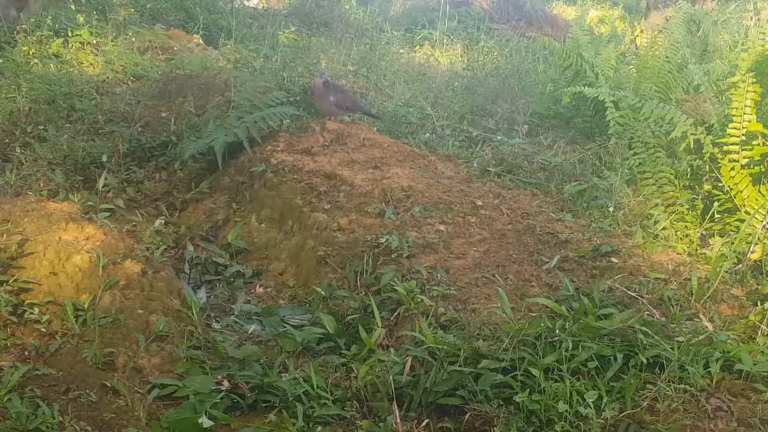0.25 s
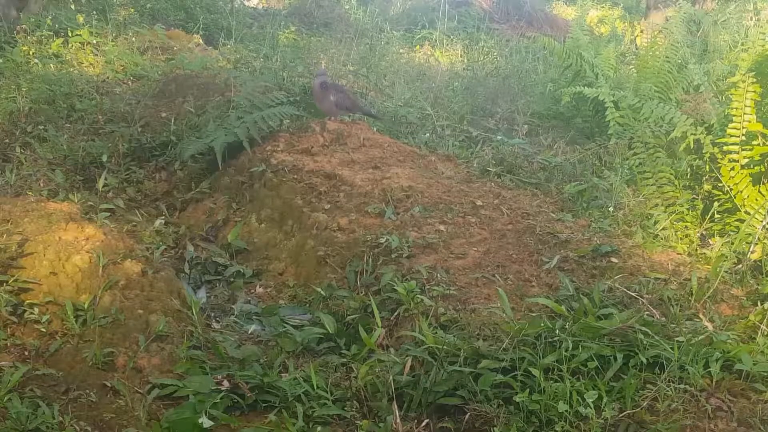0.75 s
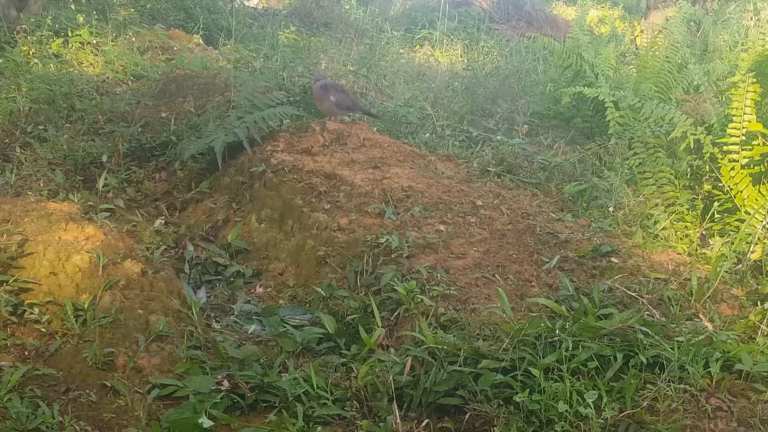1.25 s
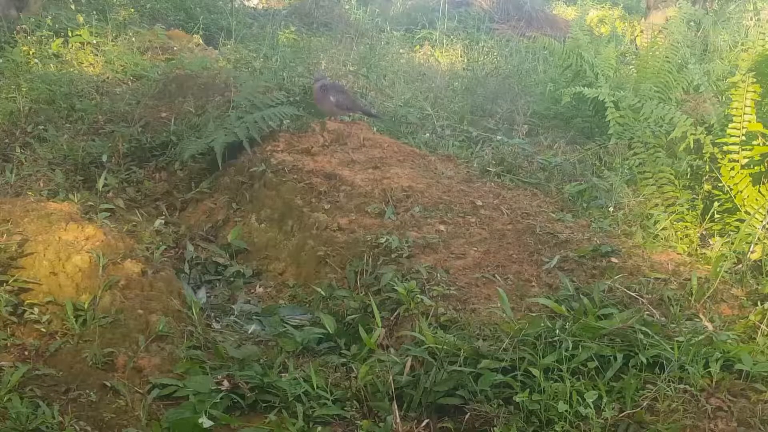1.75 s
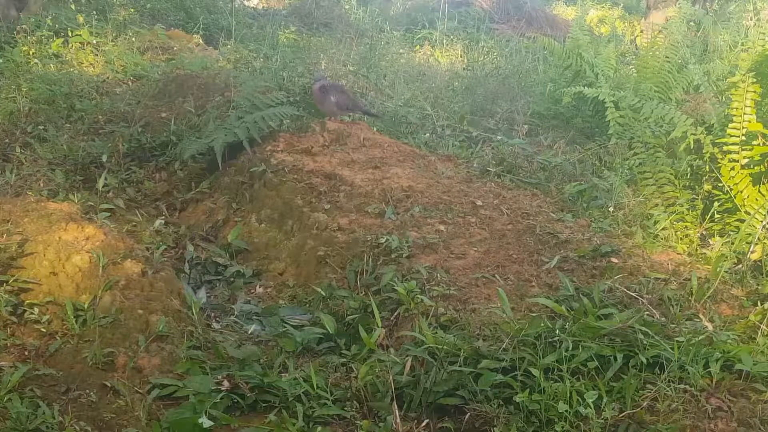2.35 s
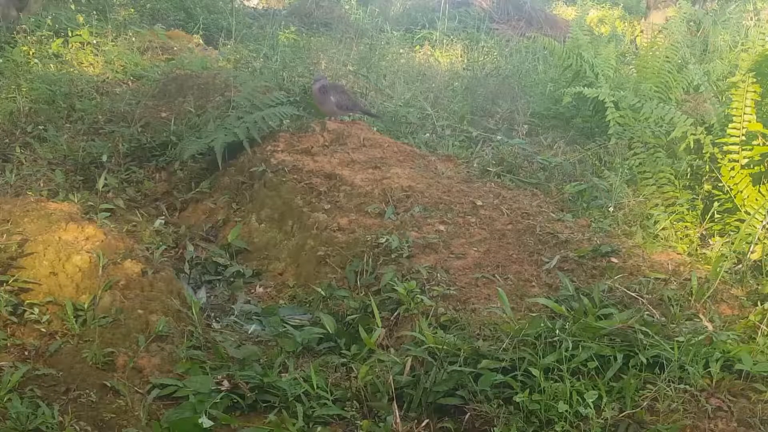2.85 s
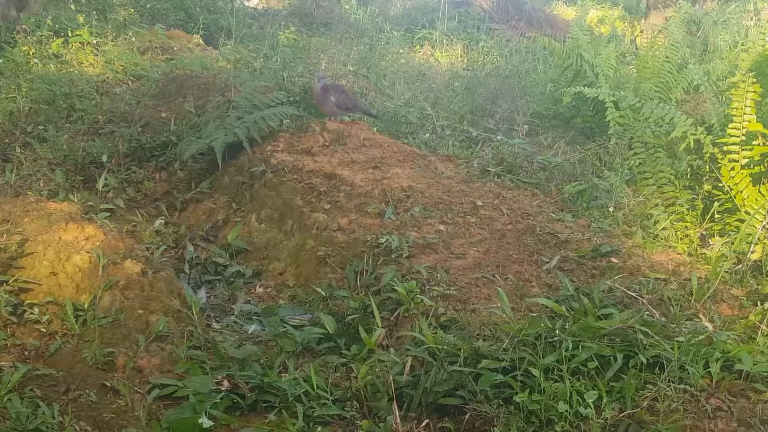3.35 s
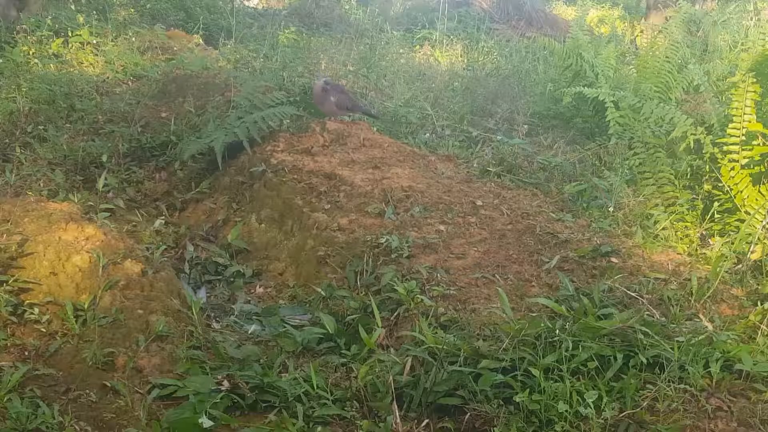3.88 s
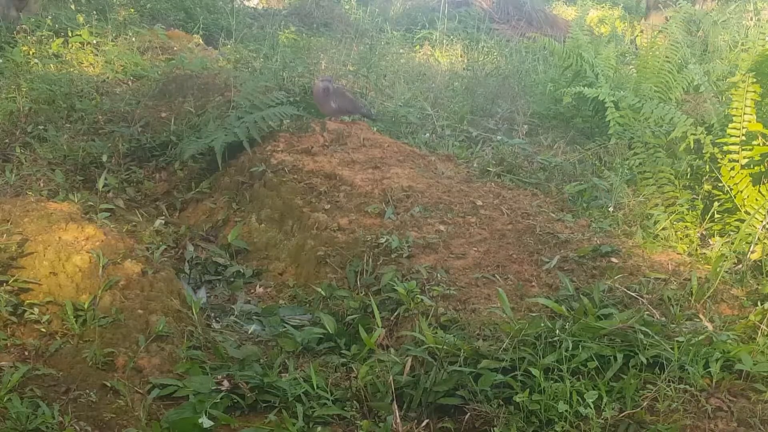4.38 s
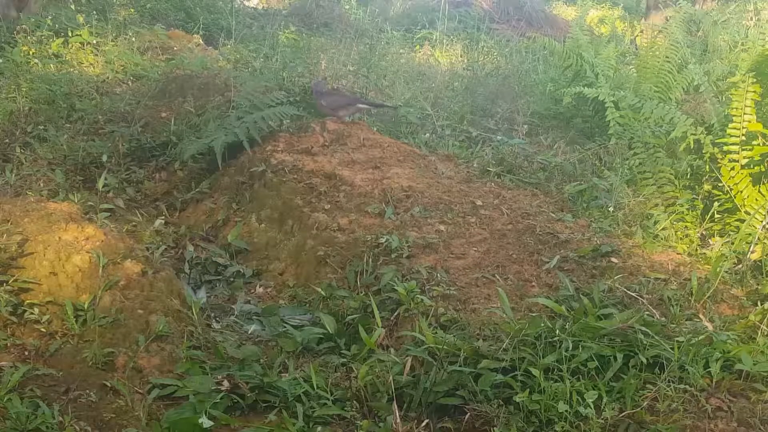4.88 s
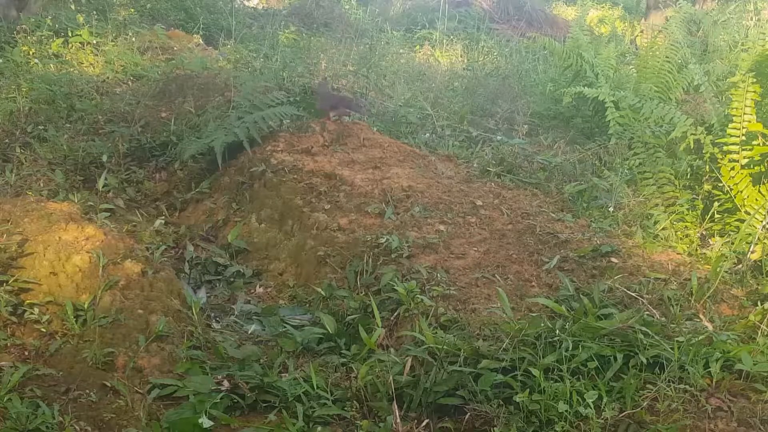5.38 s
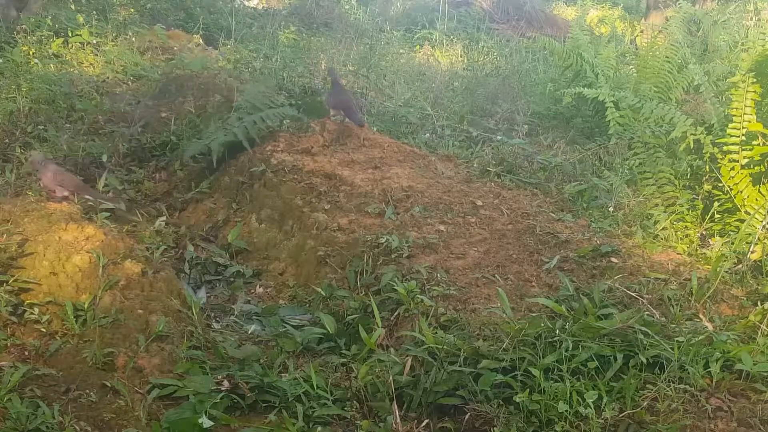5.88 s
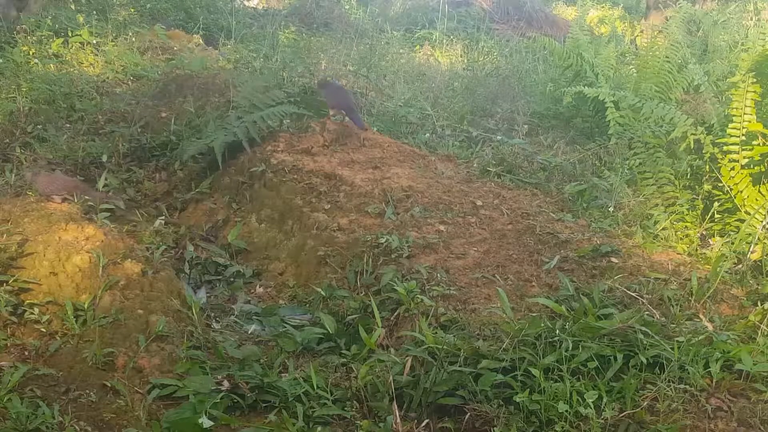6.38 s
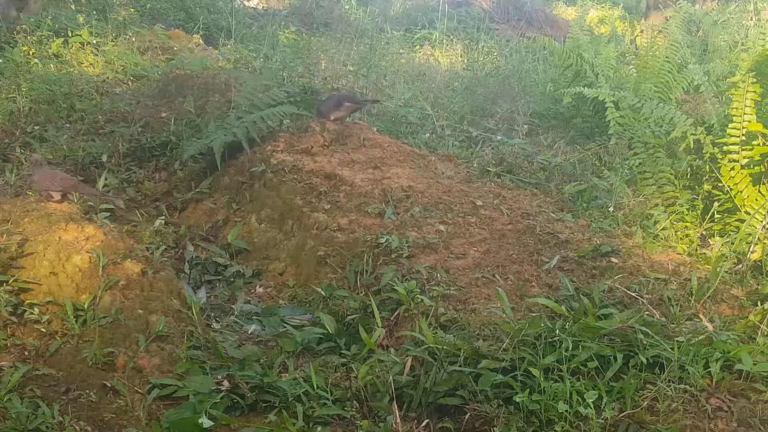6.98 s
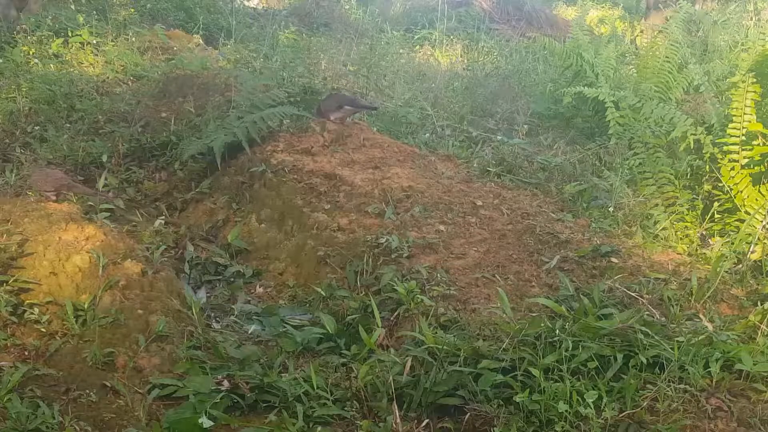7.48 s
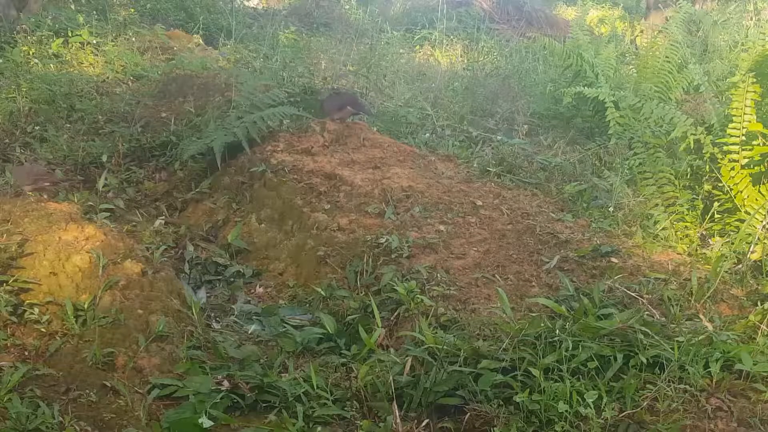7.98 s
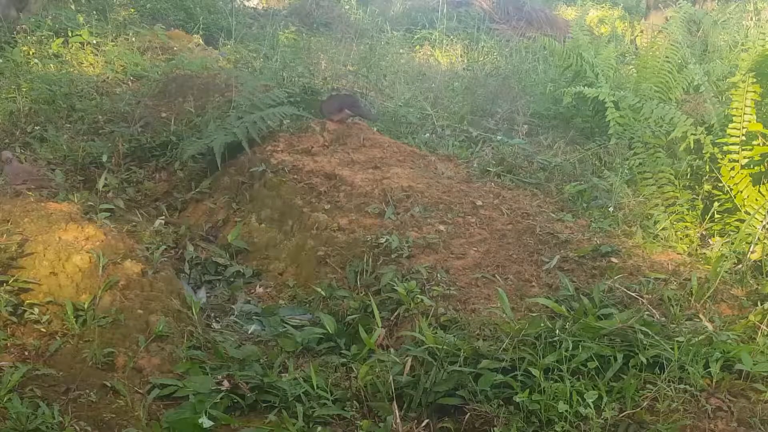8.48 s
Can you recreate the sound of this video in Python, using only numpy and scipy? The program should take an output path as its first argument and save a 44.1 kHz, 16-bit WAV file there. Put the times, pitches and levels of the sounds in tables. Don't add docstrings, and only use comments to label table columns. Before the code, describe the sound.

Over steady cricket chirps, rasping far insects and fine air hiss, doves call with mellow, nearly pure tones chopped by throat flutter. Distant and near songs alternate first, with faint bird whistles and a tiny twitter. Gentle clucks and steps lead to a short thumping flurry of wings and a landing on earth. Afterwards, close rolling growls fill the end. Open-air stereo, slight woodland reverberation, light wind buffets.

```python
import sys
import numpy as np
from scipy import signal
from scipy.io import wavfile

SR = 44100
rng = np.random.default_rng(int(sys.argv[2]) if len(sys.argv) > 2 else 0)


def dump(signal):
    limited = np.clip(np.atleast_2d(signal).T, -1, 1)
    pcm = np.round(limited * 32767).astype(np.int16)
    wavfile.write(sys.argv[1], SR, pcm)


def decibels_to_gain(level_db):
    exponent = np.asarray(level_db, float) / 20
    return 10 ** exponent


N = 384993
T = np.arange(N) / SR

# (frequency [Hz], level [dB per Hz])
AIR_COLOUR = [(22, -22), (45, -4.5), (80, -3), (150, -12), (250, -12), (500, -14), (900, -18.5),
              (2000, -20.5), (3300, -21), (4300, -31.5)]
# (frequency [Hz], level [dB per Hz])
HISS_COLOUR = [(3500, -39), (4500, -9), (6200, 9.5), (8000, 5), (9500, 4), (12000, -10), (14300, 6.5),
               (15000, -25)]
AIR_DB, HISS_DB = -63, -63
# (frequency [Hz], likeness [0 to 1])
LIKENESS = [(30, 1), (60, 0.98), (150, 0.83), (400, 0.52), (1000, 0), (2500, 0.0019), (15000, 0)]
# (frequency [Hz], left-right step [dB])
SIDE_LEAN = [(40, -1), (180, -2.5), (550, -0.5), (1650, -2), (5000, -3.5), (15000, 5.5)]
# (time [s], level [dB])
BREEZE = [(0, -66), (.6, -67), (1.2, -71.5), (1.8, -67), (2.4, -72.5), (3, -74), (4, -76), (5, -72),
          (5.6, -75), (6.2, -72.5), (7.5, -74), (8.73, -76)]
# (middle [s], length [s], level [dB])
BUFFETS = [(0.049, 0.041, -58), (0.156, 0.046, -54), (0.416, 0.063, -62), (0.681, 0.11, -65),
           (1.668, 0.061, -64), (1.95, 0.074, -67), (2.144, 0.1, -62), (2.408, 0.041, -62),
           (2.53, 0.065, -59.5), (2.788, 0.044, -63), (3.402, 0.12, -64), (4.854, .1, -65),
           (6.75, 0.086, -72), (7.8, 0.082, -68)]
DRONE_HZ, DRONE_WIDTH_HZ, DRONE_DB = 146, 13.8, -74.5
CHORUS_DB = -58

# (pulse rate [per s], lateness [turns], left-right step [dB])
TREE_CRICKETS = [
    (14.94, 0, 8),
    (14.18, .54, -3),
]
TREE_CRICKET_DB = -65

# (time [s], chirp rate [per s])
CHIRP_PACE = [(0, 17.592), (1, 17.987), (1.7, 17.788), (2.3, 17.088), (3.1, 17.129), (3.6, 18.021),
              (4.2, 18.418), (4.7, 19.343), (5.3, 19.185), (6.2, 18.873), (8.73, 18.158)]
CHIRPS_AT_START = -.409
# (from its middle [ms], length [ms], pitch [Hz], level [dB], octave [dB], bite [dB])
STROKES = [
    (-20.5, 5, 6780, -5, -6, -30),
    (-6.5, 5.5, 6940, -2, 0, 0),
    (6, 6, 6920, 0, 0, 0),
    (12.5, 6, 6830, -13, -12, -30),
]
WING_DB, WING_OCTAVE_DB = -57.5, -64.5
# (time [s], level [dB], pitch [Hz])
BITE = [
    (4.3, -63.5, 7210),
    (5.8, -55, 7325),
    (8.73, -53, 7370),
]
BITE_RISE_S, BITE_FALL_HZ_PER_S = .001, 70000

# (time [s], pitch [Hz], level [dB])
WHISTLES = [
    [(.1, 1980, -79), (.17, 2200, -74), (.25, 2320, -74), (.33, 2340, -75)],
    [(1.25, 2900, -80), (1.33, 3000, -79), (1.5, 2850, -76), (1.65, 2750, -79)],
    [(1.7, 2330, -78), (1.79, 2330, -72), (1.87, 2300, -78)],
    [(2.74, 2820, -80), (2.83, 2850, -76), (2.92, 2830, -80)],
]
# (middle [s], length [s], level [dB])
STIRS = [(0.921, 0.08, -68), (1.705, 0.93, -70), (3.93, 0.73, -75), (6.3, 0.16, -71), (6.464, 0.072, -71),
         (7.44, 0.68, -70.5), (5.35, 0.043, -64), (5.4, .03, -65), (5.504, .05, -61), (5.652, .12, -63),
         (5.05, 0.25, -75)]

# (time [s], peak [dB], body pitch [Hz], left-right step [dB])
CLUCKS = [(3.766, -53, 550, -5), (3.85, -55, 580, -3.0), (3.886, -60, 370, -2.5), (3.967, -52.5, 560, -4),
          (4.101, -56, 498, 5), (4.238, -58, 376, -1.5), (4.377, -55.5, 573, -2.5), (4.529, -59, 390, -6),
          (4.795, -64, 616, -2.5), (4.869, -59.5, 608, -7), (5.21, -50.5, 306, 0.5),
          (4.104, -59, 746, -2.5), (4.232, -58, 800, -2.5), (4.55, -59, 745, -5), (4.58, -61, 750, -2.5),
          (4.45, -65, 734, -2.5)]
# (time [s], peak [dB], body pitch [Hz], feather snap [dB])
BEATS = [(5.31, -49.5, 322, -16), (5.331, -53, 158, -14), (5.353, -45.5, 288, -15), (5.365, -49, 269, -20),
         (5.399, -53, 246, -32), (5.4532, -37, 344, -26), (5.484, -52, 301, -2), (5.499, -49, 447, -18),
         (5.506, -43.5, 1064, -30), (5.534, -33.5, 428, -28), (5.558, -45, 157, 5.5),
         (5.592, -51, 407, -17), (5.623, -44.5, 284, -21), (5.668, -47, 295, -22), (5.704, -50, 556, -23),
         (5.727, -41, 151, -9), (5.695, -47, 75, -35), (5.565, -51, 85, -35), (5.385, -55, 90, -35),
         (5.63, -51, 336, -25), (5.782, -52, 162, -20), (5.325, -54, 970, -30), (5.343, -58, 1280, -30),
         (5.462, -50, 760, -28), (5.544, -45, 530, -30), (5.595, -49, 1050, -30), (5.611, -57, 250, -30),
         (5.65, -53, 345, -18), (5.676, -53, 1050, -30), (5.686, -61, 250, -30), (5.749, -50.5, 250, -30),
         (5.798, -53, 202, -30), (5.415, -57, 436, -30), (5.441, -52, 200, -30), (5.525, -43.5, 148, -30),
         (5.572, -61, 500, -22)]
# (frequency [Hz], level [dB per Hz])
RUSH_COLOUR = [(60, 7), (250, -0.5), (550, -8), (1200, -10), (4200, -24.5), (12000, -25)]
RUSH_S, RUSH_DB, RUSH_HALF_S = 5.57, -52.5, 0.16
FEATHER_DB = 1.8

# (multiple of flutter, share of the parent line's dB, level [dB])
SIDE_LINES = [(-1.0, .3, -20), (-.5, .6, -15.5), (1.5, .9, -20), (2.0, .7, -20.5), (2.5, .9, -22)]
FLAP_START_TURNS = 0.84
FLAP_LEAN_RAD = -2.55
FLAP_WANDER_DB, HALF_WANDER_DB = 2.4, 4.5

# (time from its long note [s], pitch [Hz], level [dB], throat flutter [Hz], purr [dB])
FAR_SONG = [
    [(-.47, 403, -98, 125, -10), (-.39, 573, -68.5, 128, -24), (-.33, 450, -76, 122, 2)],
    [(-.26, 470, -71, 130, -12), (-.215, 560, -72, 130, -4), (-.18, 618, -53.5, 122, -20),
     (-.15, 666, -54.5, 132, -18), (-.12, 640, -59, 125, -18)],
    [(.008, 598, -55.5, 137.3, -16), (.045, 642, -63, 165, 3.5), (.1, 622, -72, 155, 7.5),
     (.155, 659, -58, 142, -3.5), (.235, 584, -56, 143.4, -10.5), (.33, 533, -78.5, 130, 3),
     (.43, 440.5, -75, 138.5, -4)],
]
# (start of the long note [s], gain [dB])
FAR_STARTS = [
    (.345, 2),
    (3.272, 2.5),
]
FAR_SPLIT_HZ = 660

# (time [s], pitch [Hz], level [dB], throat flutter [Hz], purr [dB])
NEAR_SONG = [
    [(1.19, 420, -64, 127, -13), (1.215, 602, -43.5, 126, -20), (1.24, 620, -39.5, 121, -38),
     (1.28, 519, -54, 119, -7), (1.32, 464, -50, 137, -8), (1.355, 486, -53, 128, -6)],
    [(1.365, 488, -55, 129, -3), (1.41, 584, -49, 130.5, -5), (1.46, 609, -43.5, 137, -7.5),
     (1.5, 640, -34.5, 130, -21), (1.53, 640, -34.5, 135, -46), (1.565, 596, -43, 130, -14),
     (1.598, 430, -62, 121, -2)],
    [(1.782, 556, -47, 86.7, -10), (1.82, 655, -40.5, 88.2, 1), (1.96, 631, -37.5, 97.8, -5),
     (2.04, 622, -35.5, 125.5, -7.5), (2.1, 633, -34.5, 124, -37), (2.116, 582, -40.5, 69.6, -14.5),
     (2.24, 520, -57, 96.7, -9), (2.272, 478, -49.5, 90, -24), (2.287, 365, -67, 88.8, -22)],
]
# (time [s], pitch [Hz], level [dB], purr [dB])
RUN_NOTES = [
    (96.6, [(6.43, 549, -63, -5), (6.46, 645, -57, 5.5), (6.5, 667, -51, -0.5), (6.54, 586, -65.5, 9), (6.59, 550, -64, -8)]),
    (130, [(7.452, 466, -59, -20), (7.48, 589, -42.5, -11), (7.51, 606, -44.5, -8), (7.58, 568.4, -41, -23), (7.64, 545, -57.5, -7), (7.68, 547, -47.5, -25.5), (7.725, 448, -67, -4)]),
    (95.4, [(8.612, 514, -56, 0), (8.64, 605, -46, -2.5), (8.653, 610, -43.5, 0), (8.663, 699, -35, -21), (8.7, 707, -32.5, -26), (8.77, 688, -29, -32)]),
]
# (start [s], length [s], pitch [Hz], last level [dB], first flutter [Hz],
# strong-weak flapping [dB], purr [dB])
GROWLS = [
    (6.623, 0.278, 576, -44, 96, -6, -0.4),
    (7.026, 0.372, 597.8, -41.3, 117.6, 5, -1),
    (7.946, 0.192, 594, -45, 110, -10, 4),
    (8.256, 0.285, 601, -41.5, 123.3, -6, 1),
]
GROWL_ATTACK_S, GROWL_RELEASE_S = 0.04, 0.038
GROWL_SCOOP, GROWL_DROP, GROWL_LIFT_HZ_PER_S = .88, 0.94, 42
GROWL_OVERSHOOT, GROWL_SETTLE_S = 0.00183, 0.056
GROWL_ONSET_DB, GROWL_SWELL_DB_PER_S, GROWL_END_DB = -12, 29, -14
GROWL_SAG, GROWL_SAG_DB = .95, -7.5
GROWL_SLACK_DB = 24
GROWL_PURR_DB, PURR_FADE_DB_PER_S = -0.5, 29
FLUTTER_RISE_HZ_PER_S, FLUTTER_TOP_HZ = 92, 129.8
EVEN_AFTER_S, EVENING_DB_PER_S = .16, 60

# (time [s], left-right step [dB])
NEAR_SIDE = [(1.7, 5.5), (2.3, 4.5), (6.4, 2.5), (8.73, 3.5)]
PORT_SPLIT_HZ, OCTAVE_SIDE_DB = 980, -6.5


def rms_one(x):
    return x / np.sqrt(np.mean(x ** 2) + 1e-20)


def in_time(rows, t=T):
    s, *columns = np.transpose(rows)
    return [np.interp(t, s, column) for column in columns]


def at_hz(points, hz):
    point_hz, value = np.transpose(points)
    return np.interp(np.log(hz), np.log(point_hz), value)


def drift(rate):
    r = np.exp(-80 * np.pi * rate / SR)
    slow = signal.lfilter([1], [1, -2 * r, r * r], rng.standard_normal(N // 40 + 2002))[2000:]
    return np.interp(np.arange(N) / 40, np.arange(len(slow)), rms_one(slow))


def glide(hz):
    return 2 * np.pi * np.cumsum(hz) / SR


def butter(x, order, hz, kind="low"):
    return signal.sosfilt(signal.butter(order, hz, kind, fs=SR, output="sos"), x)


def resonate(x, hz, width_hz):
    r = np.exp(-np.pi * width_hz / SR)
    poles = [1, -2 * r * np.cos(2 * np.pi * hz / SR), r * r]
    return signal.lfilter(np.array([1, 0, -1]) * (1 - r * r) / 2, poles, x + 1e-18)


def place(x, pan_db, count):
    return np.array([np.roll(x, count) * decibels_to_gain(pan_db / 2), x * decibels_to_gain(-pan_db / 2)])


def foliage(x, t60, wet_db):
    t = T[:SR // 2]
    tail = rng.standard_normal((2, len(t))) * decibels_to_gain(-60 * t / t60) * (t > .012)
    tail = tail / np.sqrt(np.sum(tail ** 2, axis=1, keepdims=True))
    return decibels_to_gain(wet_db) * signal.fftconvolve(x[None], tail, axes=1)[:, :N]


def banded_noise(spectrum, patchy_db):
    out, together, white = 0, drift(0.16), rng.standard_normal((2, 2, N))
    lowest, highest = spectrum[0][0], spectrum[-1][0]
    edges = np.geomspace(lowest, highest, round(2.2 * np.log2(highest / lowest)) + 2)
    for k, (low, high) in enumerate(zip(edges, edges[1:])):
        mid, side = butter(white[k % 2], 2, [low, high], "band")
        hz = np.sqrt(low * high)
        alike = np.clip(at_hz(LIKENESS, hz), 0, 1)
        level_db = at_hz(spectrum, hz) + patchy_db * (.3 * together + drift(8))
        gain = decibels_to_gain(level_db + at_hz(SIDE_LEAN, hz) * np.array([[.5], [-.5]]))
        out = out + gain * (np.sqrt(1 + alike) * mid + np.sqrt(1 - alike) * side * [[1], [-1]])
    return rms_one(out)


def span(rows, fade):
    first, last = rows[0][0], rows[-1][0]
    at = slice(round((first - fade) * SR), min(round((last + fade) * SR), N))
    t = T[at]
    return at, np.clip(np.minimum(t - first, last - t) / fade + 1, 0, 1) ** 2


def hush():
    bed = decibels_to_gain(AIR_DB) * banded_noise(AIR_COLOUR, patchy_db=2.0)
    return bed + decibels_to_gain(HISS_DB) * banded_noise(HISS_COLOUR, patchy_db=1.5)


def drone():
    hum = resonate(rng.standard_normal(N), DRONE_HZ, DRONE_WIDTH_HZ)
    return decibels_to_gain(DRONE_DB) * rms_one(resonate(hum, DRONE_HZ, DRONE_WIDTH_HZ))


def breeze():
    rumble = butter(rng.standard_normal((2, N)), 2, [30, 110], "band")
    buffets = sum(decibels_to_gain(db - 6 * (2 * (T - s) / length) ** 2) for s, length, db in BUFFETS)
    steady = decibels_to_gain(in_time(BREEZE)[0] + 2.0 * drift(2.4))
    both = steady * decibels_to_gain(np.array([[-7], [2.5]])) + buffets * decibels_to_gain(np.array([[-14], [5.0]]))
    return rms_one(rumble) * both


def chorus():
    out = 0
    for per_s, pan_db in ((78.0, -28.5), (83.5, 24.5), (73.4, -20.5)):
        strokes = (.5 + .5 * np.cos(glide(per_s + 0.71 * drift(0.81)))) ** 0.49
        groups = decibels_to_gain(3.5 * np.cos(glide(5.6 + 0.25 * drift(0.43))))
        noise = rng.standard_normal((2, N))
        noise = noise + .3 * noise[::-1]
        out = out + (.4 + strokes * groups) * noise * decibels_to_gain(pan_db * np.array([[.5], [-.5]]))
    for hz, width_hz in ((5542, 376), (4940, 1200), (5123, 920)):
        out = resonate(out, hz, width_hz)
    return decibels_to_gain(CHORUS_DB) * rms_one(out)


def tree_crickets():
    out = 0
    for per_s, late, pan_db in TREE_CRICKETS:
        pulses = (.5 + .5 * np.cos(2 * np.pi * (per_s * T - late))) ** 3.5
        tone = pulses * decibels_to_gain(3 * drift(12)) * np.sin(glide(7540 + 30 * drift(60)))
        tone = decibels_to_gain(TREE_CRICKET_DB) * rms_one(tone)
        out = out + place(tone, pan_db, count=3) + foliage(tone, .08, -8)
    return out


def whistles():
    out = np.zeros(N)
    for rows in WHISTLES:
        hz, level_db = in_time(rows)
        mask = np.zeros(N)
        at, edge = span(rows, 0.035)
        mask[at] = edge
        out += mask * decibels_to_gain(level_db + 4 + 2.2 * drift(25)) * np.sin(glide(hz + 25 * drift(40)))
    return place(out, -1.5, count=0) + foliage(out, .3, -4)


def twitter():
    out, t = np.zeros(N), T[:1100]
    note = np.hanning(len(t)) * np.sin(2 * np.pi * (5400 * t - 21000 * t ** 2))
    for s in 2.45 + np.add.outer(.2385 * np.arange(4), [0, .035]).ravel():
        out[round(s * SR):][:len(t)] += note
    return place(decibels_to_gain(-56.5 + 1.5 * drift(60)) * out, -1.5, count=0)


def rustle():
    hiss = resonate(resonate(rng.standard_normal((2, N)), 2370, 2300), 2370, 2300)
    stirs = sum(decibels_to_gain(db - 8.6 * (2 * (T - s) / length) ** 2) for s, length, db in STIRS)
    return stirs * decibels_to_gain(2.9 * drift(60)) * rms_one(hiss)


def near_cricket():
    sung = CHIRPS_AT_START + np.cumsum(in_time(CHIRP_PACE)[0]) / SR
    chirp = np.clip(np.round(sung).astype(int), 0, 158)
    middles = np.interp(np.arange(160), sung, T)
    wing, octave, bite = np.zeros((3, N))
    bite_level_db, bite_hz = in_time(BITE)
    teeth = .35 * rms_one(butter(rng.standard_normal(N), 2, 350))
    for ms, length_ms, hz, wing_db, octave_db, bite_db in STROKES:
        luck = rng.standard_normal((160, 5))[chirp].T
        t = T - middles[chirp] - (ms + .5 * luck[0]) / 1000
        turn = 2 * np.pi * (hz * (1 + .005 * luck[1]) * t - 9000 * t ** 2) + teeth + 9 * luck[4]
        shape = np.exp(-.5 * (t * 2355 / length_ms) ** 2)
        wing += decibels_to_gain(wing_db + 1.04 * luck[2]) * shape * np.sin(turn)
        rough = 1 + .35 * np.roll(teeth, 999)
        octave += decibels_to_gain(octave_db + 1.5 * luck[3]) * shape ** 1.1 * rough * np.sin(2 * turn)
        since = np.clip(t + 0.0058, 0, .02)
        sweep = bite_hz * since - BITE_FALL_HZ_PER_S * (since - 2.8 * BITE_RISE_S) ** 2 / 2
        snap = since ** 2 * np.exp(-since / BITE_RISE_S)
        bite += decibels_to_gain(bite_db + 2.0 * luck[3]) * snap * np.sin(2 * np.pi * sweep + 9 * luck[2])
    low = decibels_to_gain(WING_DB) * rms_one(wing) + decibels_to_gain(bite_level_db) * rms_one(bite)
    high = decibels_to_gain(WING_OCTAVE_DB) * rms_one(octave)
    direct = place(low, 3.5, count=-13) + place(high, 17, count=-12)
    return direct + foliage(low, .045, -10.5) + foliage(high, .04, -6)


def thud(s, peak_db, hz, snap_db, pan_db, cycles):
    out, at, t = np.zeros((2, N)), round(s * SR), T[:2000]
    rise = t * hz / (cycles * (hz / 400) ** 0.79)
    puff = (rise * np.exp(1 - rise)) ** 2
    grain = rng.standard_normal((2, len(t)))
    breathy = resonate(resonate(grain[0], hz + 350, 570), hz + 250, 570)
    body = puff * (np.sin(2 * np.pi * hz * t) + 2.06 * breathy)
    crackle = 1.5 * resonate(grain[1], 1500, 3000) + .3 * grain[0]
    snap = decibels_to_gain(1.2 * snap_db + 5) * crackle * np.exp(-np.abs(t - .002) / .0015)
    out[:, at:at + len(t)] = place(decibels_to_gain(peak_db) * (body + snap), pan_db, count=0)
    return out


def clucks():
    return sum(thud(s, db - 6, hz, -25, pan_db, cycles=3.6) for s, db, hz, pan_db in CLUCKS)


def wings():
    rush_db = RUSH_DB - 4.4 * ((T - RUSH_S) / RUSH_HALF_S) ** 2 + FEATHER_DB * drift(32)
    rush = decibels_to_gain(rush_db) * banded_noise(RUSH_COLOUR, patchy_db=2.0)
    return rush + sum(thud(*beat, pan_db=.3, cycles=1.7) for beat in BEATS)


def dove(calls, octave_db, wobble, breath_db):
    out, shake, unsteady = np.zeros(N), drift(25), drift(23.3)
    breath = rms_one(resonate(resonate(rng.standard_normal(N), 750, 300), 750, 300))
    uneven = [drift(22) for line in SIDE_LINES]
    for rows in calls:
        at, edge = span(rows, 0.00797)
        hz, level_db, flutter, full_db, half_db, slack_db = in_time(rows, T[at])
        points = np.array(rows)
        level_db = 20 * np.log10(np.interp(T[at], points[:, 0], decibels_to_gain(points[:, 2])))
        tone = glide(hz * (1 + .005 * shake[at]))
        flap = 2 * np.pi * FLAP_START_TURNS + glide(flutter * (1 + wobble * unsteady[at]))
        lean = FLAP_LEAN_RAD * np.clip((half_db - full_db) / 8, 0, 1)
        valve = 1 + decibels_to_gain(full_db + FLAP_WANDER_DB * uneven[0][at]) * np.exp(1j * (flap + lean))
        half_wander_db = HALF_WANDER_DB * uneven[2][at] * (full_db > half_db)
        valve = valve + decibels_to_gain(half_db + half_wander_db) * np.exp(.5j * flap)
        for (multiple, share, line_db), luck in zip(SIDE_LINES, uneven):
            is_half_way = round(2 * multiple) % 2
            parent_db = np.minimum(half_db, full_db + 12) if is_half_way else full_db
            line_db = line_db + slack_db * (multiple == -1)
            line_db = line_db + share * np.minimum(parent_db, -4) + 3 * luck[at]
            phase = multiple * flap + np.sign(multiple) * np.minimum(lean, -1.3)
            phase = phase + .5 * abs(multiple) * luck[at]
            valve = valve + decibels_to_gain(line_db) * np.exp(1j * phase)
        top_db = octave_db + 1.2 * uneven[1][at] - .7 * (level_db + 42) - 1.6 * np.maximum(half_db + 12, 0)
        top_db = top_db - 1.5 * np.maximum(full_db, 0) - .14 * np.maximum(hz - 650, 0)
        below_db = np.minimum(full_db, 0) - 4 + 3 * uneven[3][at]
        octave = np.cos(2 * tone) + decibels_to_gain(below_db) * np.cos(2 * tone - flap)
        octave = decibels_to_gain(top_db) * (octave + decibels_to_gain(2 * full_db - 8) * np.cos(2 * tone + flap))
        air_db = breath_db + 0.73 * np.minimum(full_db, 0) - 1.5 * np.maximum(half_db, 0)
        turbulence = decibels_to_gain(air_db) * breath[at] * np.abs(valve)
        voice = np.sqrt(2) * (np.real(valve * np.exp(1j * tone)) + octave)
        out[at] += edge * decibels_to_gain(level_db) * (voice + turbulence)
    return out


def song(notes, share, offset_db, closing, start=0, gain_db=0):
    def row(s, hz, db, flutter, purr_db):
        full_db = share * purr_db + offset_db - closing * max(db + 39.5, 0)
        return start + s, hz, db + gain_db, flutter, full_db, purr_db, 0
    return [[row(*point) for point in rows] for rows in notes if start + rows[0][0] > 0]


def far_dove():
    calls = sum((song(FAR_SONG, 1.84, -1.6, 0, s, db) for s, db in FAR_STARTS), [])
    far = dove(calls, octave_db=-45, wobble=.07, breath_db=-34) * decibels_to_gain(1.5 * drift(18))
    both = place(far, 2.0, count=4)
    both[1] -= .75 * resonate(both[1], .9 * FAR_SPLIT_HZ, 130)
    return both + foliage(far, .45, -10.5)


def run_note(flutter, rows):
    return [(s, hz, db, flutter, purr_db, .3 * purr_db - 15, 0) for s, hz, db, purr_db in rows]


def growl(start, length, hz, level_db, flutter, uneven_db, harder_db):
    held = np.linspace(GROWL_ATTACK_S, length - GROWL_RELEASE_S, num=5)
    still = np.zeros(len(held))
    s = np.r_[0, held, length - .6 * GROWL_RELEASE_S, length]
    settle = np.exp(-((held - 1.63 * GROWL_ATTACK_S) / GROWL_SETTLE_S) ** 2)
    over = 1 + GROWL_OVERSHOOT * (FLUTTER_TOP_HZ - flutter) * settle
    pitch = hz + GROWL_LIFT_HZ_PER_S * (s - length / 2)
    pitch = pitch * np.r_[GROWL_SCOOP, over, GROWL_SAG, GROWL_DROP]
    level = level_db - GROWL_SWELL_DB_PER_S * (held[-1] - s)
    level = level + np.r_[GROWL_ONSET_DB, still, GROWL_SAG_DB, GROWL_END_DB]
    slack_db = GROWL_SLACK_DB * np.r_[1, still, .5, .9]
    quick = np.minimum(flutter + FLUTTER_RISE_HZ_PER_S * s, FLUTTER_TOP_HZ) * (1 - .012 * slack_db)
    purr_db = GROWL_PURR_DB - PURR_FADE_DB_PER_S * s + harder_db - .5 * slack_db
    half_db = 1.35 * purr_db - 5 + uneven_db - EVENING_DB_PER_S * np.maximum(s - EVEN_AFTER_S, 0)
    return np.transpose([start + s, pitch, level, quick, purr_db, half_db, slack_db])


def near_dove():
    calls = song(NEAR_SONG, .8, -13, 3.2)
    calls = calls + [run_note(*note) for note in RUN_NOTES] + [growl(*row) for row in GROWLS]
    near = dove(calls, octave_db=-25.0, wobble=0.047, breath_db=-14.0)
    low, high = (butter(near, 4, PORT_SPLIT_HZ, kind) for kind in ("low", "high"))
    both = place(low, in_time(NEAR_SIDE)[0], count=-4) + place(high, OCTAVE_SIDE_DB, count=4)
    return both + foliage(near, .6, -12.5)


def scene():
    background = hush() + drone() + breeze() + chorus() + tree_crickets()
    small_sounds = whistles() + twitter() + rustle() + near_cricket()
    return background + small_sounds + clucks() + wings() + far_dove() + near_dove()


def roll_off(x):
    return signal.sosfilt(signal.butter(12, 15740, fs=SR, output="sos"), x)


def record(dry):
    cut = signal.sosfilt(signal.cheby2(16, 38, 14900, fs=SR, output="sos"), dry)
    return roll_off(cut - .0006)


dry = scene()
out = record(dry)
dump(out)
```